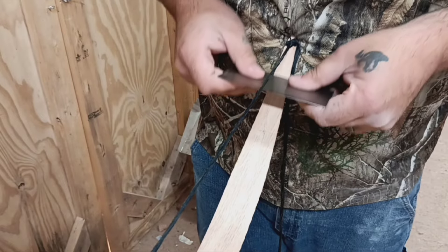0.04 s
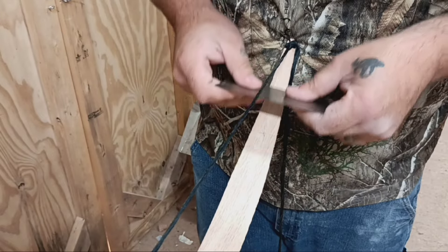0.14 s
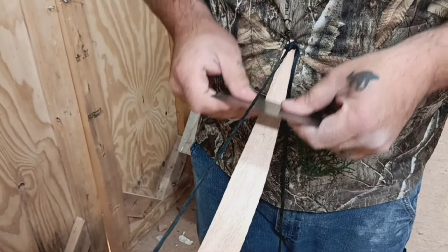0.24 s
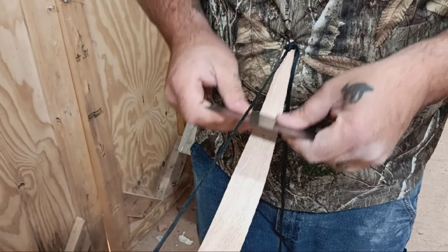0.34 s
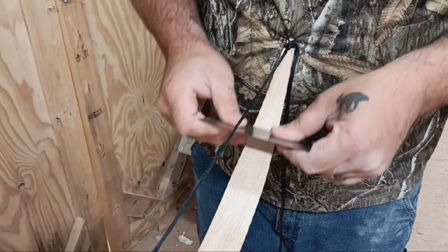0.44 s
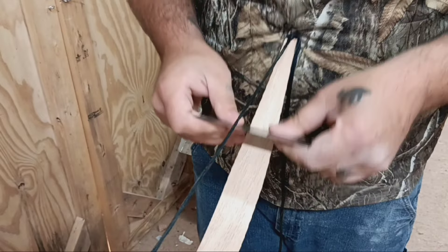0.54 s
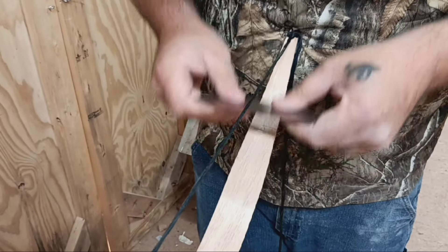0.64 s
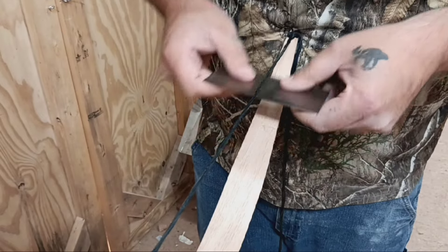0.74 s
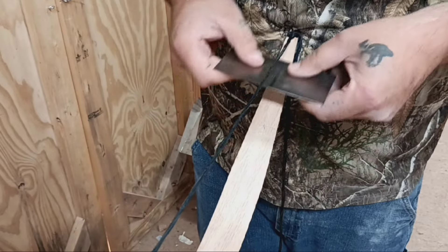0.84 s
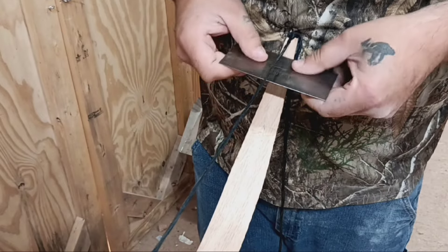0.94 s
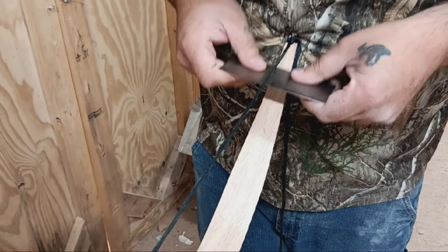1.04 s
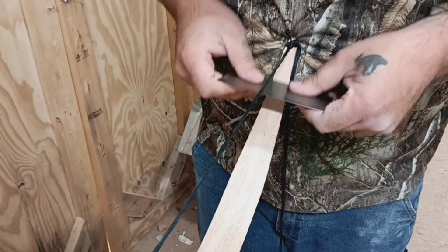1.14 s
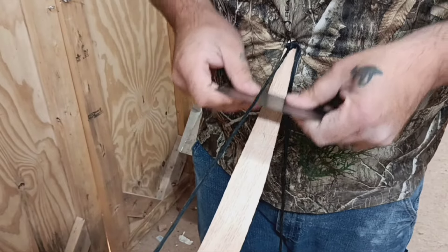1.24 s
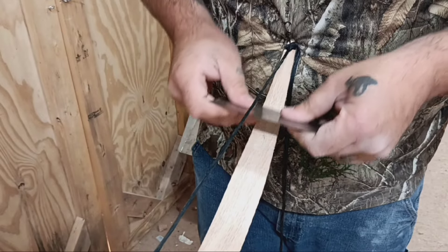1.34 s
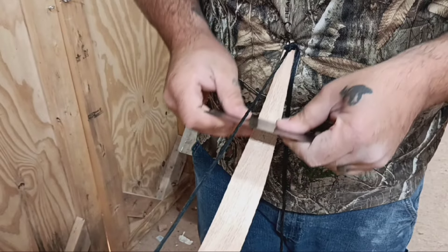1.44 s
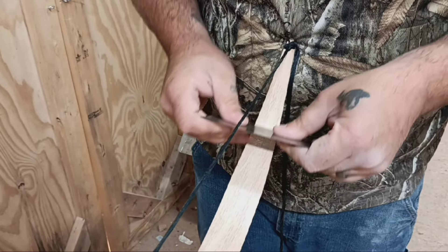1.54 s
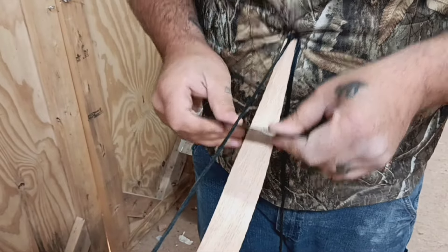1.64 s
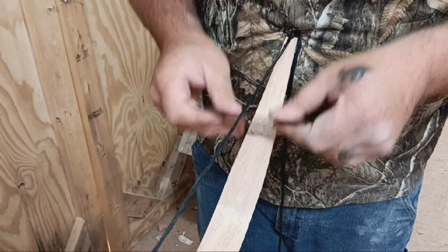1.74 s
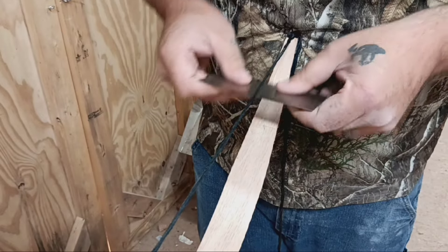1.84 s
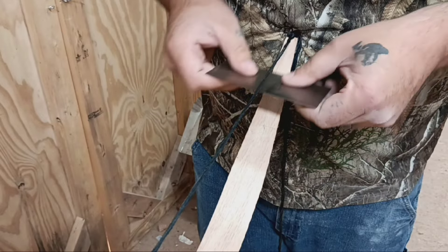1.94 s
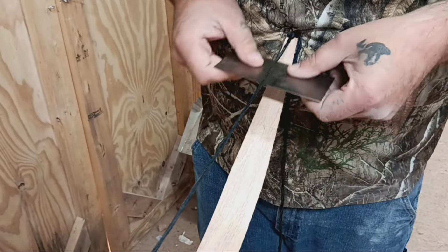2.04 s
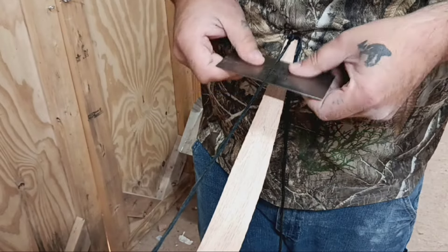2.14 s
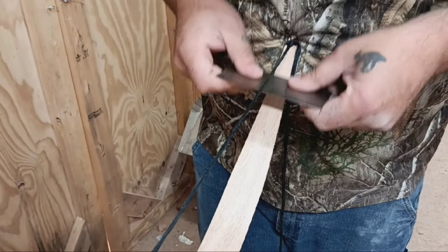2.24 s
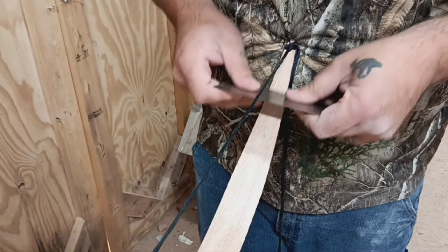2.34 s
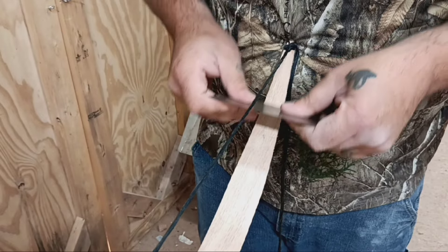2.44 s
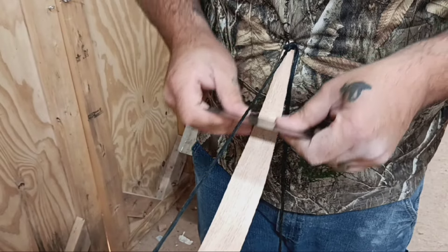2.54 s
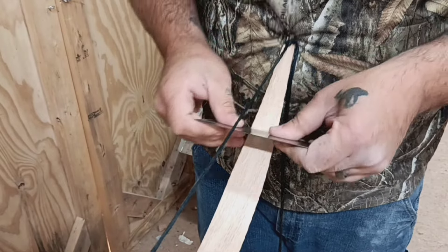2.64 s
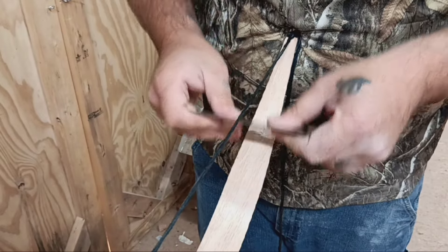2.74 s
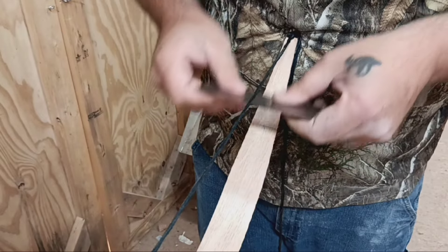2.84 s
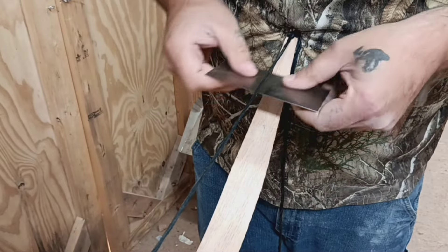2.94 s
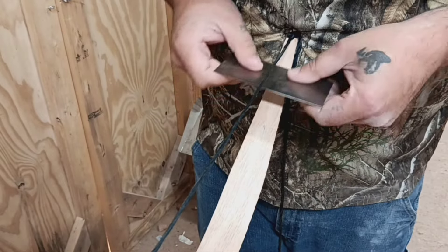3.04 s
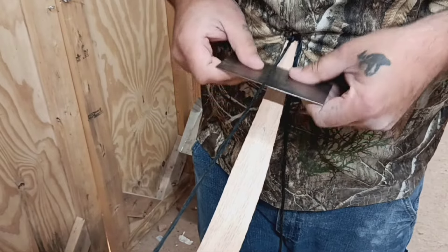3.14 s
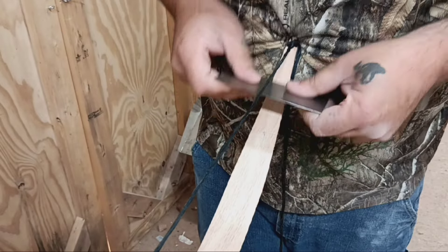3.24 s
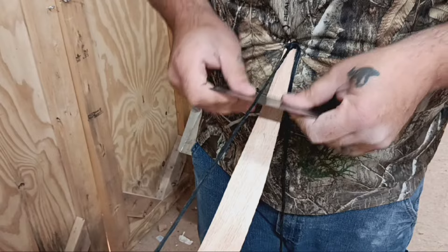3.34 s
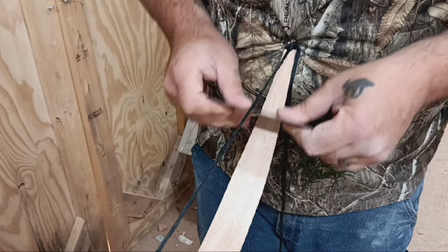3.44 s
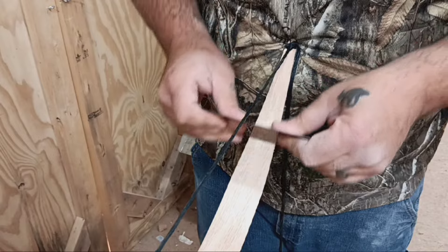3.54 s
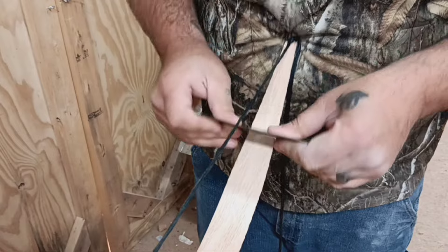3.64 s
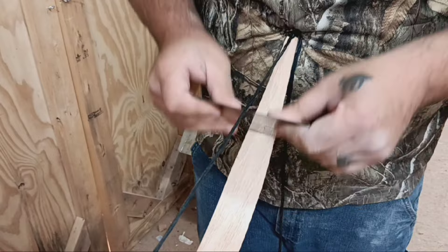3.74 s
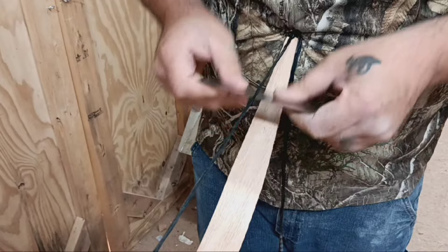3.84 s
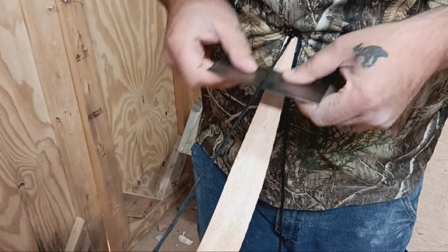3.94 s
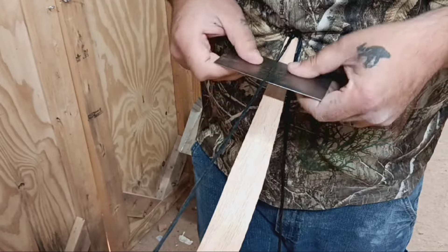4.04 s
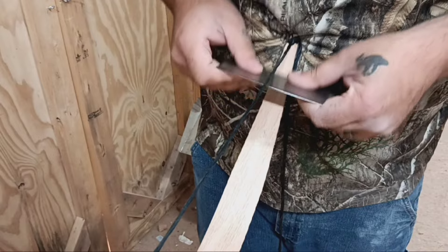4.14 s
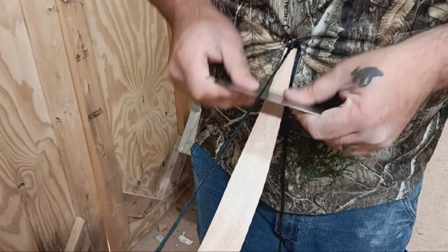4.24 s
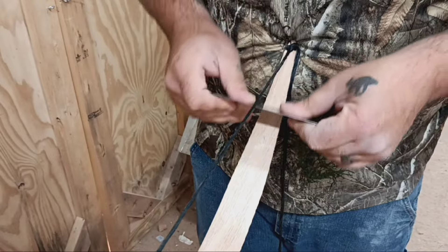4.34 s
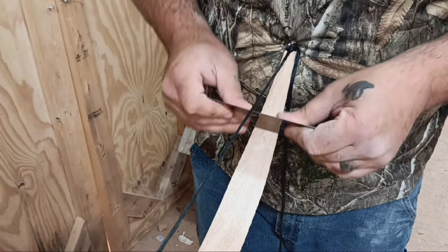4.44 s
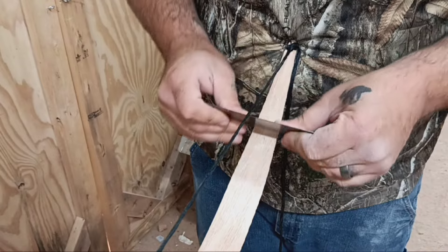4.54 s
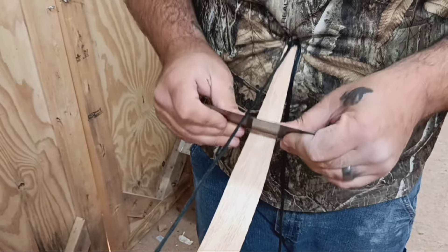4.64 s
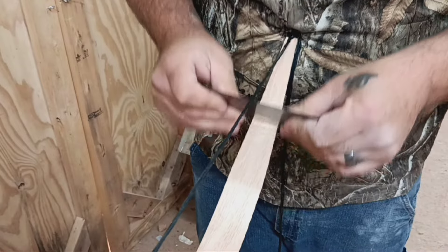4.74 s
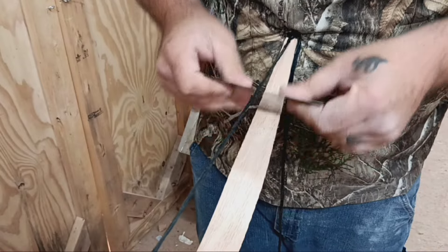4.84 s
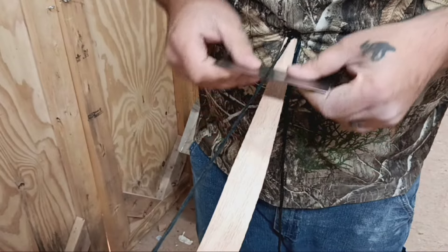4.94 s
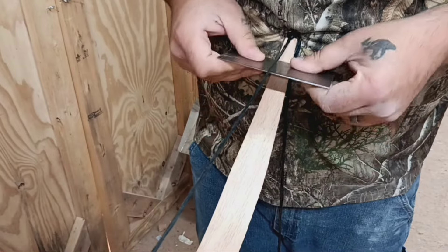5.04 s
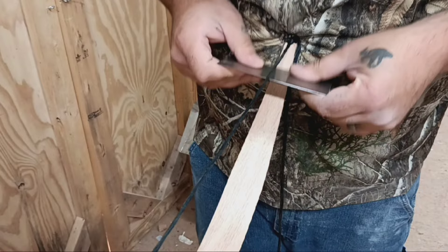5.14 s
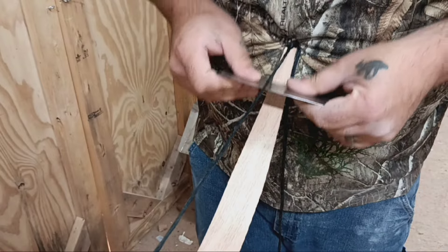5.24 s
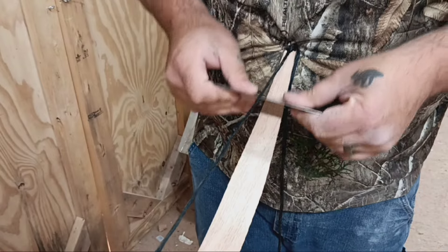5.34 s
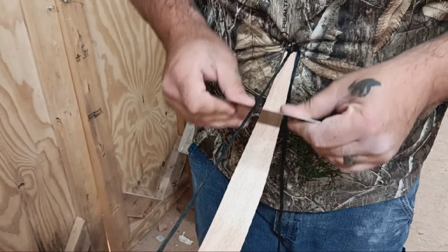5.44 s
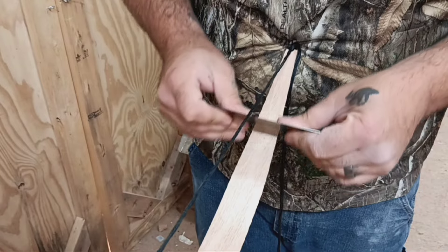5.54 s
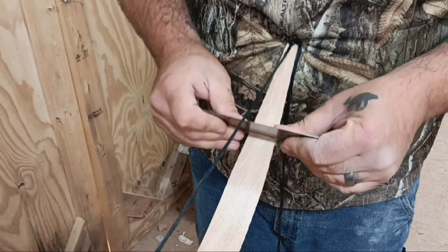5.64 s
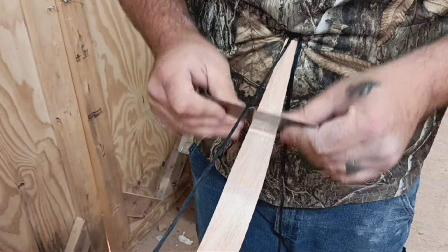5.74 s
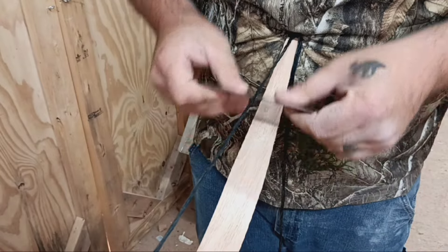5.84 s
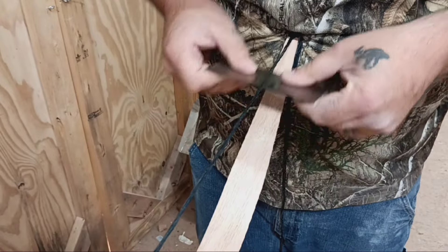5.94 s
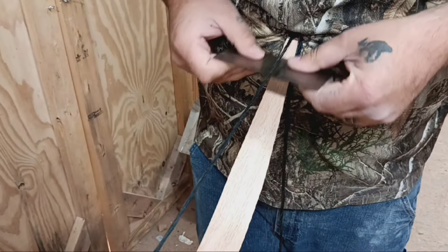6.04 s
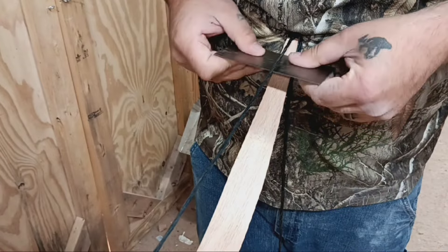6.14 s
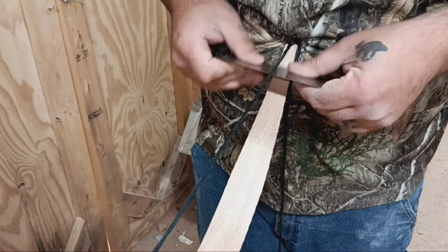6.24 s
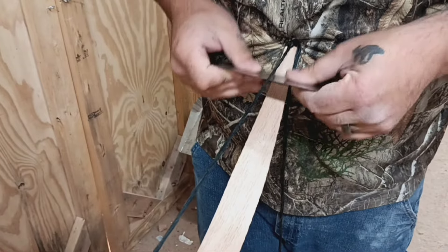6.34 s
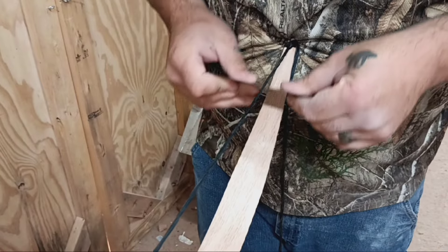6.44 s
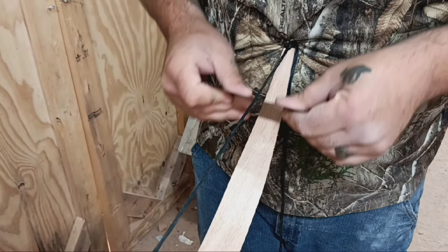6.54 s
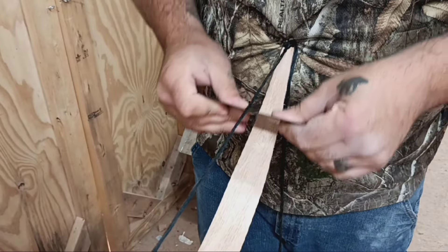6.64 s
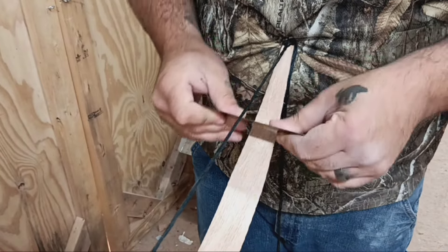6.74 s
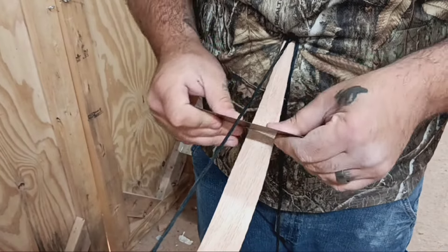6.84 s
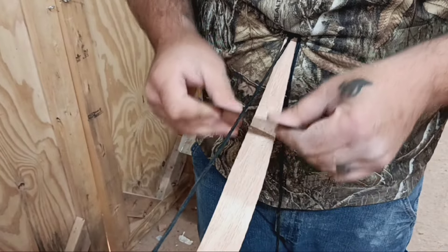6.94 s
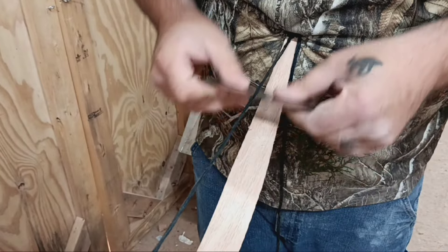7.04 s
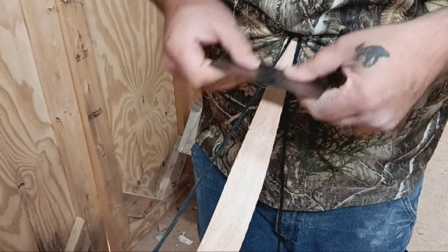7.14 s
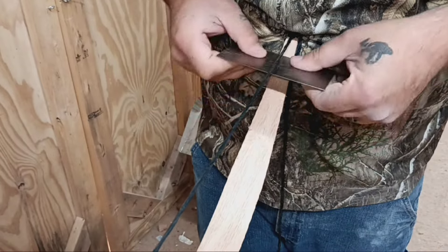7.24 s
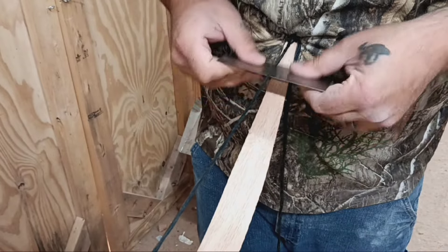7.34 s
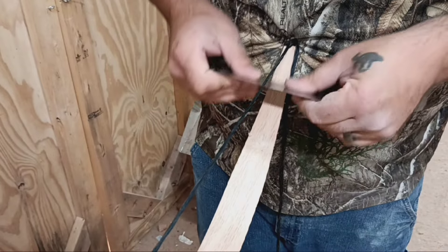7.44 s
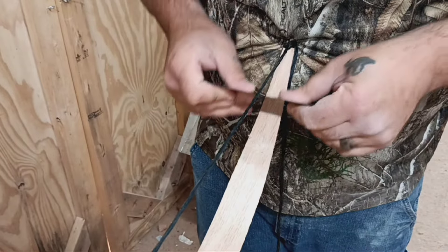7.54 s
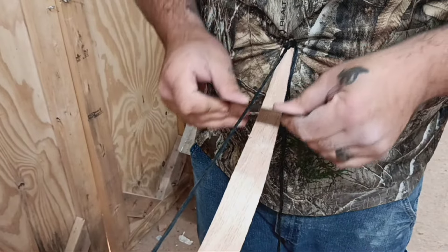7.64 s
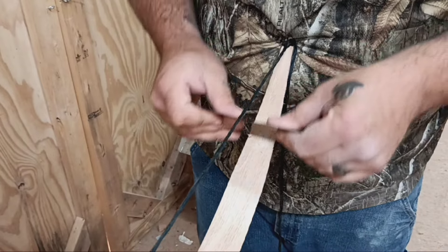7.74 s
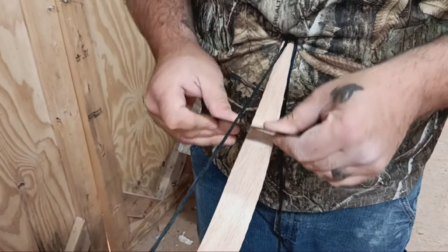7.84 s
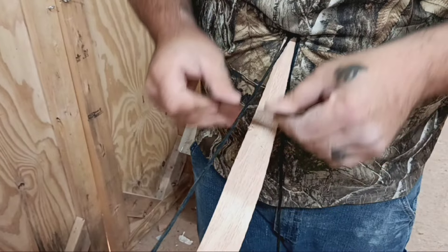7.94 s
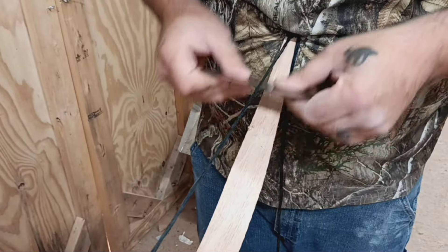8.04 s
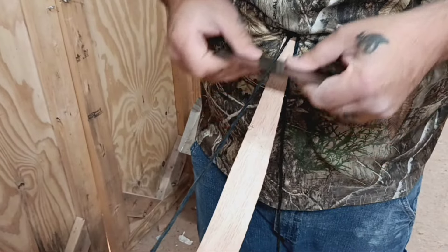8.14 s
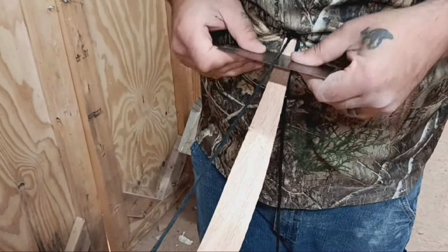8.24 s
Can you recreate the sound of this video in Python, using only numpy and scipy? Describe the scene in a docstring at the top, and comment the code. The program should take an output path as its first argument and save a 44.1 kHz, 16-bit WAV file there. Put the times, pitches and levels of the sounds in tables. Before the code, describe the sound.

A steel scraper rasps along a wooden bow limb in eight steady strokes, each preceded by a light tap, the last two chattering.

```python
"""Card scraper on a wooden bow limb

Eight pulls of a steel blade in a small workshop, heard close by through the two ports of a phone.
The blade taps down, then random fibre breaks ring its steel while coarser slips shake and flex the limb.
In the last two pulls above all the edge catches and chatters in short hops of noise.
Plywood walls answer with a short tail of decaying noise; still air lies beneath."""
import sys
import numpy as np
from scipy import signal
from scipy.fft import rfft, irfft, next_fast_len
from scipy.io import wavfile
from scipy.ndimage import uniform_filter1d, map_coordinates

SR = 44100
rng = np.random.default_rng(int(sys.argv[2]) if len(sys.argv) > 2 else 0)


def file_out(sig):
    """Save sig as 16-bit WAV at sys.argv[1]."""
    # one column per channel
    cols = np.atleast_2d(sig).T
    # limit, then scale
    lim = np.clip(cols, -1, 1)
    pcm = np.round(lim * 32767).astype(np.int16)
    wavfile.write(sys.argv[1], SR, pcm)


N = 364662
T = np.arange(N) / SR
HOP_S = 0.0035  # hop interval of the sprung blade: faint in every cut, hard when it catches

# Levels and lifts are settings ahead of the walls and the port colours.
# pulls of the blade: start_s, length_s, attack_s, release_s, hardest_at (share of length), cut_db there,
#   build_up_db, drag_end_db, drag_rise_db, flex_db, mid_stroke_dip_db, treble_lift_db (before effort),
#   fibre_scatter_db, freedom (factor on the lifts of the singing blade)
STROKES = [ (-0.02, 0.52, 0.014, 0.035, 0.87, -29.5, 14, -35, 7.5, -45, 4, 1, 3.5, 1.1),
           (0.956, 0.67, 0.078, 0.027, 0.86, -35, 10, -36, 3, -43, 8, 3, 0.5, 1.9),
           (2.12, 0.55, 0.051, 0.018, 0.79, -33.5, 14.5, -37, 8.5, -47, 1.5, 3.5, 3.5, 1.4),
           (3.126, 0.52, 0.025, 0.018, 0.8, -32, 11, -37, 0, -42.5, 11.5, 4, 3, 1.4),
           (4.083, 0.59, 0.024, 0.011, 0.8, -33, 5.5, -35.5, 2, -44, 6, 2.5, 3.5, 1.05),
           (5.102, 0.576, 0.025, 0.021, 0.84, -32, 11, -38.5, 4.5, -47.5, 0.5, 3.5, 3.5, 1.4),
           (6.204, 0.58, 0.012, 0.056, 0.95, -35.5, 15, -35, 13, -43.5, 1.5, 1.5, 2.5, 0.73),
           (7.284, 0.51, 0.04, 0.035, 0.99, -34.5, 8, -31.5, 14.5, -47, -1, 1, 2.5, 0.7), ]
# landings of the blade: start_s, knock_db, limb_ring_db, skid_db
TAPS = [(0.935, -37, -53, -76), (2.012, -31.5, -39, -44), (2.999, -23.5, -35.5, -39),
        (4.0273, -20.5, -40, -52.5), (5.032, -33, -43, -63.5), (6.087, -44.5, -56.5, -59),
        (6.202, -58, -55, -46), (7.2205, -28, -44.5, -64), (8.187, -39, -45.5, -55.5)]
# broad colour of cutting steel: freq_hz, relative_density_db
CUT = [(700, -31.5), (1300, 2.5), (1700, 3), (2800, 0.5), (3600, -4), (6500, -3), (8300, -5.5),
       (10000, -1.5), (12000, -9.5), (15500, -14)]
# broad colour of the flexing limb: freq_hz, relative_density_db
FLEX = [(25, -36.5), (90, -17), (140, -13), (180, -2.5), (270, -1), (350, 3), (420, -7.5), (600, -25),
        (1500, -57.5)]
# steady limb resonances: freq_hz, width_hz, lift_db
LIMB = [(190, 24, 13), (272, 38, 9.5), (329, 12, 0.5), (542, 100, 9.5), (601, 11, 5), (690, 66, 6.5),
        (783.4, 21, 5.5), (908, 130, 6.5), (1060, 23, 7.5)]


def undb(db):
    """Decibels to gain."""
    return 10 ** (np.asarray(db) / 20)


def unit(x):
    """Scale to rms 1."""
    return x / np.sqrt(np.mean(x ** 2))


def along(points, hz):
    """Read (Hz, value) points on a log-frequency axis."""
    f, value = np.transpose(points)
    return np.interp(np.log(hz), np.log(f), value)


def response(points, modes=(), size=8192):
    """Minimum-phase impulse response of a broad colour with resonances on top."""
    hz = np.maximum(np.arange(size // 2 + 1) * SR / size, 1)
    db = along(points, hz)
    for f, width, lift in modes:
        db = db + lift / (1 + (2 * (hz - f) / width) ** 2)
    cepstrum = irfft(np.log(undb(db)))
    cepstrum[1:size // 2] *= 2
    cepstrum[size // 2 + 1:] = 0
    return irfft(np.exp(rfft(cepstrum)))


def ring(x, h):
    """Pass a sound through an impulse response."""
    return signal.oaconvolve(x, h)[:N]


def walk(knots_per_s):
    """Slow random signal: straight lines between normal random knots."""
    knots = rng.standard_normal(N // 32)
    return 0.95 * np.interp(T * knots_per_s, np.arange(len(knots)), knots)


def swell(peak_s, rise_s, fall_s):
    """Gain that grows exponentially to 1 at peak_s and dies away after it."""
    return np.exp(-np.maximum((peak_s - T) / rise_s, (T - peak_s) / fall_s))


def add(track, start_s, sound):
    """Mix a short sound into a track."""
    start = int(start_s * SR)
    track[start:start + len(sound)] += sound[:N - start]


def scraping():
    """Tearing fibres ring the blade; coarser stick and slip shakes and flexes the limb. One row per side."""
    # blade resonances: freq_hz, width_hz, lift_db (scaled by nearness, freedom and chance),
    #   place and reach (stroke lengths), glide (share of pitch per stroke length)
    blade_modes = [(1420, 78, 14, 0.05, 0.22, 0.03), (1980, 94, 10, 0.5, 0.34, -0.062),
                   (1940, 78, 4, 0.13, 0.3, -0.0067), (2630, 270, 2.5, 0.05, 0.25, 0.013),
                   (2660, 89, 8, 0.4, 0.28, 0), (4120, 170, 8, 0.57, 0.61, 0.043),
                   (5620, 340, 10, 0.54, 0.16, -0.033), (10300, 1000, 5, 0.67, 0.17, -0.015)]
    # travelling limb resonances, same columns
    wood_modes = [(332, 47, 11.5, 0.16, 0.14, 0), (957, 90, 9.5, 0.28, 0.36, 0.11),
                  (1050, 100, 16, 0.86, 0.12, 0.034), (800, 97, 7, 0.92, 0.2, -0.08),
                  (590, 130, 7, 1.2, 0.83, -0.15), (1150, 1800, -16, 1.32, 0.45, 0)]
    # broad colour of the dragged wood: freq_hz, relative_density_db
    drag_colour = [(250, -32), (420, 1), (600, -4.5), (1050, -4), (1300, 0.5), (2000, -13.5), (4000, -39)]
    late_treble_db = -2  # treble change of the cut over one stroke
    coarsen = 3  # how steeply slips thin out and grow coarser over the last 30 % of a stroke

    cut_gain, drag_gain, flex_gain = strokes()
    starts, lengths, *_, lifts, scatters, freedoms = np.transpose(STROKES)
    middles = starts + lengths / 2
    lift_db = np.interp(T, middles, lifts)
    scatter_db = np.interp(T, middles, scatters)
    freedom = np.interp(T, middles, freedoms)
    travel = travelled()

    # hand pressure wavers; the edge rasps in uneven spells of tiny hops
    pressure = undb(.8 * walk(50))
    rasp = np.sin(2 * np.pi * np.cumsum(1 + .25 * walk(120)) / (HOP_S * SR))
    bite = undb(2.2 * rasp * (1 + np.tanh(walk(14)))) * pressure

    # the two halves of the blade share only part of the crackle
    middle, left, right = (fractures(per_s=9000, scatter_db=scatter_db) for _ in range(3))
    crackle = (undb(-7.5) * middle + np.array([left, right])) * bite
    fibres = wander(crackle, depth_db=2.6, rate=13, band_hz=170)
    steel = response(CUT)
    cut = unit(np.array([ring(side, steel) for side in singing(fibres, blade_modes, travel, freedom)]))
    cut = brighten(cut, cut_gain, lift_db + late_treble_db * (travel - .5)) * cut_gain

    slowing = np.exp(-coarsen * np.clip((travel - .7) / .3, 0, 1))
    slips = fractures(per_s=2500 * slowing, scatter_db=0.73 * scatter_db) * bite
    grain = wander(slips, depth_db=2.0, rate=9, band_hz=74.0)
    drag = unit(ring(singing(grain, wood_modes, travel), response(drag_colour, LIMB))) * drag_gain
    flex = unit(ring(slips, response(FLEX, LIMB))) * flex_gain
    return cut + drag + flex


def strokes():
    """Gains of cut, drag and flexing: each pull builds up and eases off; the limb dips near a node."""
    build_curve, ease_db = 1.156, 9.5  # curve > 1: early build-up is faster; easing from hardest point to end
    flex_attack_s, wood_linger = 0.1, 1.72  # wood release in blade releases
    node_at, node_width = 0.48, 0.32  # stroke lengths
    node_drag = 0.86  # share of the node dip in the drag
    cut, drag, flex = np.zeros((3, N))
    for (start_s, length_s, attack_s, release_s, hardest, cut_db, build_db,
         drag_db, rise_db, flex_db, dip_db, *_) in STROKES:
        travel = np.clip((T - start_s) / length_s, 0, 1)
        hardest = np.clip(hardest, .05, .95)
        before = np.maximum(1 - travel / hardest, 0)
        after = np.maximum(travel - hardest, 0) / (1 - hardest)
        effort_db = -build_db * before ** build_curve - ease_db * after ** 2
        node_db = -dip_db * np.exp(-((travel - node_at) / node_width) ** 2)
        grip_db = node_drag * node_db - rise_db * (1 - travel)
        wood_release_s = wood_linger * release_s
        cut += undb(cut_db + effort_db) * contact(start_s, length_s, attack_s, release_s)
        drag += undb(drag_db + grip_db) * contact(start_s, length_s, attack_s, wood_release_s)
        flex += undb(flex_db + node_db) * contact(start_s, length_s, flex_attack_s, wood_release_s)
    return cut, drag, flex


def contact(start_s, length_s, attack_s, release_s):
    """Attack, hold and release of the edge; the release steepens as the blade comes to rest."""
    attack = np.clip((T - start_s) / attack_s, 0, 1)
    over_s = np.maximum(T - start_s - length_s, 0)
    return attack * np.exp(-(over_s / release_s) ** 2.74)


def travelled():
    """Time since the latest pull began, in stroke lengths; above 1 after its end."""
    starts, lengths, *_ = np.transpose(STROKES)
    k = np.maximum(np.searchsorted(starts, T) - 1, 0)
    return (T - starts[k]) / lengths[k]


def fractures(per_s, scatter_db):
    """Random tiny breaks, mostly small, a few large, bigger where rarer; held to an even running level."""
    size = undb(scatter_db * np.minimum(rng.exponential(size=N), 5)) / np.sqrt(per_s)
    clicks = (rng.random(N) < per_s / SR) * size * rng.choice([-1, 1], N)
    return clicks / np.sqrt(uniform_filter1d(clicks ** 2, SR // 8) + 1e-12)


def wander(x, depth_db, rate, band_hz):
    """The contact travels over the grain, so narrow bands swell and fade on their own."""
    hz, s, frames = signal.stft(x, SR, nperseg=1024)
    knots = rng.standard_normal((400, 200))
    grid = np.meshgrid(hz / band_hz, s * rate, indexing="ij")
    swells = map_coordinates(knots, grid, order=2, mode="mirror")
    return signal.istft(frames * undb(depth_db * swells), SR)[1][..., :N]


def singing(x, modes, travel, freedom=1, flare=0.4, drift=0.01):
    """Each resonance swells, glides and fades as the edge passes its place, with some chance."""
    out, detune = x, drift * walk(7)
    for hz, width_hz, lift_db, place, reach, glide in modes:
        pitch_hz = hz * (1 + glide * (travel - place) + detune)
        angle = 2 * np.pi * np.cumsum(pitch_hz) / SR
        pole = np.exp(-np.pi * width_hz / SR)
        # gliding band-pass: shift to 0 Hz, smooth, shift back
        band = 0
        for wave in (np.cos(angle), np.sin(angle)):
            band = band + 2 * wave * signal.lfilter([1 - pole], [1, -pole], x * wave)
        near = np.exp(-((travel - place) / reach) ** 2)
        gain_db = freedom * lift_db * near * (0.5 + flare * np.tanh(walk(9)))
        out = out + band * (undb(gain_db) - 1)
    return out


def brighten(x, gain, lift_db, slope=0.24, pivot_db=-31, shelf_hz=6000):
    """The harder the edge cuts, the more of its sound lies in the treble."""
    treble = signal.sosfilt(signal.butter(1, shelf_hz, "high", fs=SR, output="sos"), x)
    effort = (gain / undb(pivot_db) + 1e-6) ** slope
    return x + treble * (undb(lift_db) * effort - 1)


def chatter(snap_s=0.00047, uneven_db=2.5):
    """A caught edge hops at nearly even steps, each hop a short snap of splintering wood."""
    # catches of the edge: start_s, level_db (before uneven hops), skipping_s
    catches = [(1.655, -29, .002), (6.39, -22.5, .01), (6.417, -24, .006), (6.4844, -13.5, .005),
               (6.4949, -14, .005), (6.529, -16.5, .002), (6.574, -20.5, .013), (6.6333, -9.5, .012),
               (6.65, -7, .002), (6.686, -10, .002), (6.695, -11.5, .012), (6.714, -13, .002),
               (6.7355, -11.5, .002), (6.745, -12.5, .002), (6.7483, -17, .002), (6.7556, -18, .002),
               (6.82, -24.5, .002), (6.845, -29, .002), (7.455, -18.5, .01), (7.52, -16, .005),
               (7.543, -17, .002), (7.632, -20.5, .017), (7.7422, -11, .005), (7.756, -24, .02)]
    # broad colour of a snap: freq_hz, relative_density_db
    snap_colour = [(150, -28), (350, 1.5), (900, -4), (2000, -5), (4200, -12), (7500, -9), (9300, -6.5),
                   (10500, -7.5), (12500, -14.5), (15500, -19.5)]
    # ring of the blade springing free: freq_hz, width_hz, lift_db
    snap_modes = [(4320, 220, 10.5), (9600, 650, 6.5)]
    snaps, t = np.zeros(N), T[:SR // 200]
    colour = response(snap_colour, snap_modes, size=1024)
    for start_s, db, length_s in catches:
        chance = rng.standard_normal((8, len(t)))
        steps_s = HOP_S * rng.uniform(.85, 1.15, 8)
        hops = min(int(length_s / HOP_S) + 1, len(chance))
        for k in range(hops):
            snap = np.convolve(chance[k] * t * np.exp(-t / snap_s), colour)
            gain = undb(db - uneven_db * abs(chance[k, -1]))
            add(snaps, start_s + steps_s[:k].sum(), gain * snap / abs(snap).max())
    return snaps


def taps(knock_hz=2120, knock_s=0.00048, crack_db=-14, crack_s=0.0021, bend_hz=1150, spread_s=0.012,
         bend_s=0.018, skid_s=0.058, rustle_db=-1, rustle_s=0.045, shake_db=-2, ring_s=0.079, rise_s=0.01):
    """Steel lands on wood: crack, compact knock, skid, bending wave, then the limb rattles and shakes."""
    # ring of a blade pressed onto wood: freq_hz, width_hz, lift_db
    tick_modes = [(2020, 870, 6)]
    # broad colour of the limb rattling under the blade: freq_hz, relative_density_db
    rustle_colour = [(280, -18.5), (480, 2.5), (880, 3.5), (1150, -4.5), (2000, -34.5)]
    # lowest limb modes as the landing strikes them: freq_hz, width_hz, lift_db
    knock_modes = [(LIMB[0][0], 7.1, 3.7), (LIMB[2][0], 25, 11)]
    cracks, knocks, rustles, shakes, skids = np.zeros((5, N))
    t = T[:SR // 3]
    lead_s = 0.0012  # the crack outruns the knock
    for start_s, db, ring_db, skid_db in TAPS:
        chance = rng.standard_normal((4, len(t)))
        crack = undb(db + crack_db) * chance[3] * np.exp(-t / crack_s)
        add(cracks, start_s - lead_s, crack)
        knock = np.sin(2 * np.pi * knock_hz * t) * np.exp(-((t - lead_s) / knock_s) ** 2)
        add(knocks, start_s - lead_s, undb(db) * knock)
        # high bending waves arrive first
        turns = LIMB[2][0] * t + bend_hz * t / (1 + t / spread_s)
        bend = np.sin(2 * np.pi * turns) * np.exp(-(t / bend_s) ** 2)
        add(knocks, start_s, undb(ring_db) * bend)
        shaken = undb(ring_db) * (1 - np.exp(-t / rise_s))
        add(rustles, start_s, undb(rustle_db) * shaken * chance[0] * np.exp(-t / rustle_s))
        add(shakes, start_s, undb(shake_db) * shaken * chance[1] * np.exp(-t / ring_s))
        add(skids, start_s, undb(skid_db) * chance[2] * np.exp(-(t / skid_s) ** 2))
    steel = response(CUT, tick_modes)
    wood = response(rustle_colour)
    limb = response(FLEX, knock_modes)
    rattle = ring(rustles, wood / np.linalg.norm(wood))
    shake = ring(shakes, limb / np.linalg.norm(limb))
    return knocks + ring(cracks + skids, steel) + rattle + shake


def judder():
    """Stick and slip locks to the limb for a few cycles: short sines that swell and fade."""
    # start_s, rate_hz, length_s, peak_db
    judders = [(4.628, 191, 0.031, -37), (4.672, 213, 0.028, -31), (6.355, 159, 0.024, -49),
               (6.435, 174, 0.057, -35.5), (7.51, 183.2, 0.083, -35)]
    track = np.zeros(N)
    for start_s, hz, length_s, db in judders:
        t = T[:int(length_s * SR)]
        add(track, start_s, undb(db) * np.sin(np.pi * t / length_s) * np.sin(2 * np.pi * hz * t))
    return track


def shudder():
    """The whole bow shudders as the edge sticks: swells of deep filtered noise."""
    # peak_s, level_db, rise_s, fall_s
    shudders = [(4.72, -58.5, 0.12, 0.11), (6.55, -44, 0.06, 0.098), (6.73, -48.5, 0.03, 0.046)]
    # broad colour of the rumble: freq_hz, relative_density_db
    rumble_colour = [(15, -20), (35, 1), (55, 3), (90, -13), (160, -10), (400, -79.5)]
    gain = sum(undb(db) * swell(s, rise_s, fall_s) for s, db, rise_s, fall_s in shudders)
    return gain * unit(ring(rng.standard_normal(N), response(rumble_colour)))


def halo(lead_s=0.035, stop_s=0.014):
    """A faint hiss of filtered noise that swells up to each landing and stops soon after."""
    gain = sum(swell(start_s, lead_s, stop_s) for start_s, *_ in TAPS)
    hiss_colour = response([(300, 1.5), (10000, -3.0), (14000, -16)])
    return undb(-67.5) * gain * unit(ring(rng.standard_normal(N), hiss_colour))


def workshop(early_s=0.0082, early_db=2, first_s=0.0023):
    """Impulse response of dense reflections: near walls first, then a tail that loses its treble sooner."""
    # decay of the room: freq_hz, t60_s
    decay = [(150, 0.4), (750, 0.39), (1300, 0.34), (3500, 0.28), (8000, 0.18), (14000, 0.12)]
    t = T[:int(.7 * SR)]
    hz = np.maximum(np.arange(len(t) // 2 + 1) * SR / len(t), 1)
    noise = rfft(rng.standard_normal(len(t)))
    centres_hz, t60s = np.transpose(decay)
    tail = 0
    for share, t60_s in zip(np.eye(len(decay)), t60s):
        band = irfft(noise * along(np.c_[centres_hz, share], hz), len(t))
        tail = tail + band * np.exp(-np.log(1000) * t / t60_s)
    tail = tail * (t > first_s) * (1 + undb(early_db) * np.exp(-t / early_s))
    # the walls favour no broad band over another
    spectrum = rfft(tail, 2 * len(t))
    power = uniform_filter1d(uniform_filter1d(abs(spectrum) ** 2, size=100), size=100)
    return irfft(spectrum / np.sqrt(power))[:len(t)]


def reflections(x, bass_turn_hz=1.5, treble_turn_hz=7):
    """Reflections shift as the blade travels, faster in the treble: sound turns between two wall patterns."""
    bass = signal.sosfilt(signal.butter(1, 1500, fs=SR, output="sos"), x)
    turning_bass = bass * np.exp(2j * np.pi * bass_turn_hz * T)
    shifted = turning_bass + (x - bass) * np.exp(2j * np.pi * treble_turn_hz * T)
    return ring(shifted.real, workshop()) + ring(shifted.imag, workshop())


def close_ports(pair, shared_hz=520):
    """Ports close together hear the same bass from the walls and unrelated treble."""
    size = next_fast_len(N + SR, True)
    hz = np.maximum(np.arange(size // 2 + 1) * SR / size, 1)
    left, right = rfft(pair, size)
    shared = 1 / (1 + (hz / shared_hz) ** 2)
    mixed = shared * left + np.sqrt(1 - shared ** 2) * right
    return np.array([pair[0], irfft(mixed, size)[:N]])


def suppress(x, threshold_db=-52, slope=0.27, deepest_db=-6, window_s=0.0072):
    """The phone's noise suppressor turns quiet passages down, which shortens the tails."""
    power = uniform_filter1d(np.mean(x ** 2, axis=0), max(int(window_s * SR), 1))
    level_db = 10 * np.log10(np.maximum(power, 1e-12))
    return x * undb(np.clip(slope * (level_db - threshold_db), deepest_db, 0))


def scene():
    """Both ports hear the work directly and off the walls, over still air; the left a little later."""
    # port colours: freq_hz, gain_db
    left_colour = [(100, 5.5), (1300, 1), (2200, 5), (3300, 5), (4500, 1.5), (8500, 0.5), (9400, -8),
                   (10200, -24.5), (15000, -31)]
    right_colour = [(100, -1), (1300, -4), (2200, 1.5), (3300, 4.5), (4500, 4.5), (8500, 5), (10000, 8.5),
                    (15000, 2.5)]
    # broad colour of still air: freq_hz, relative_density_db
    air_colour = [(20, -3.5), (60, 0.5), (150, -9), (400, -15.5), (2000, -23.5), (6000, -29),
                  (15000, -37.5)]
    air_db, left_lag_samples = -74.5, 42
    scrape_wet_db, tap_wet_db, skip_wet_db = 0, -7, -2.5  # send to the walls against the direct sound

    scrape, skips = scraping(), chatter()
    tap = taps() + judder() + halo()
    direct = scrape + tap + skips + shudder()
    to_walls = undb(scrape_wet_db) * scrape + undb(tap_wet_db) * tap + undb(skip_wet_db) * skips
    walls = close_ports(np.array([reflections(side) for side in to_walls]))
    shared_air = rng.standard_normal(N)
    ports = []
    for sound, lag, colour in zip(direct + walls, (left_lag_samples, 0), (left_colour, right_colour)):
        own_air = 0.81 * rng.standard_normal(N)
        air = undb(air_db) * unit(ring(shared_air + own_air, response(air_colour)))
        ports.append(ring(np.pad(sound, (lag, 0))[:N] + air, response(colour)))
    return np.array(ports)


def record(dry):
    """The phone turns the gaps down and cuts the top."""
    top_hz = 15800
    low_pass = signal.ellip(10, .2, 80, top_hz, fs=SR, output="sos")
    return signal.sosfilt(low_pass, suppress(dry))


dry = scene()
out = record(dry)
file_out(out)
```